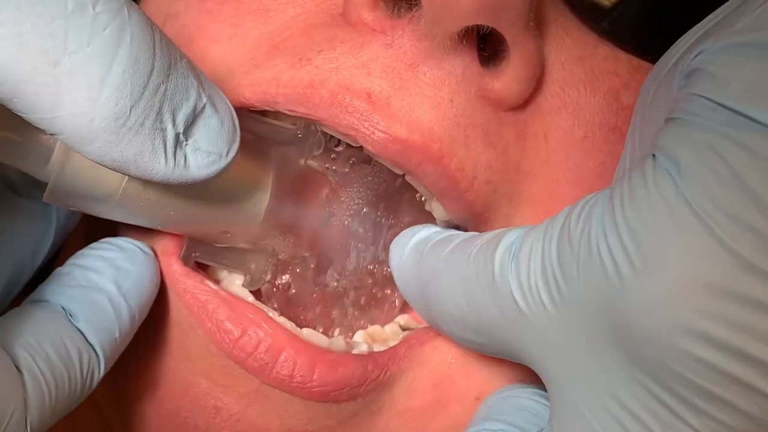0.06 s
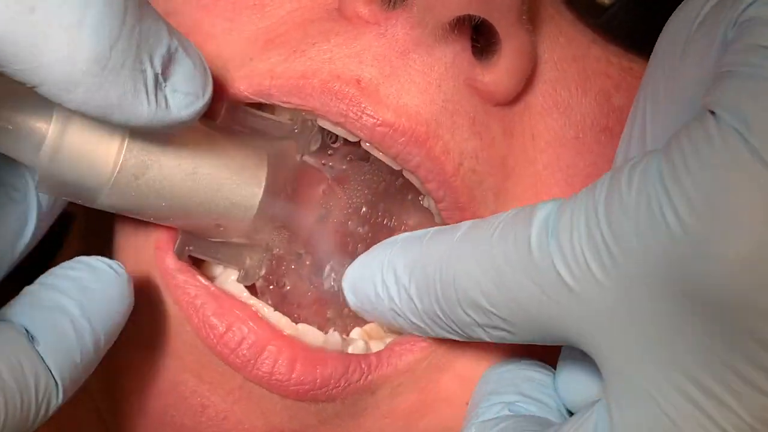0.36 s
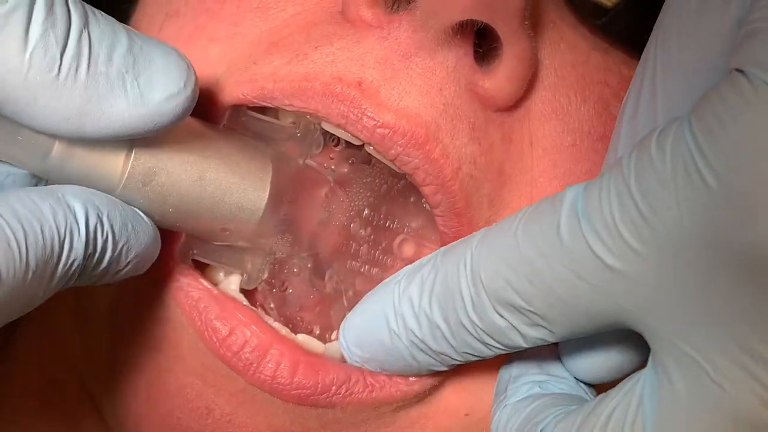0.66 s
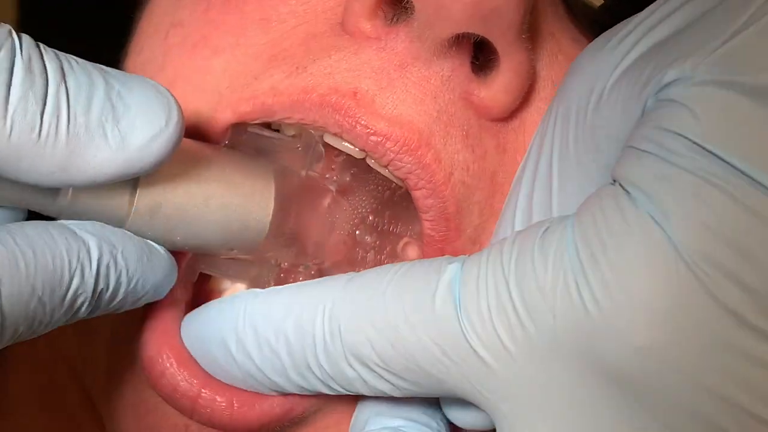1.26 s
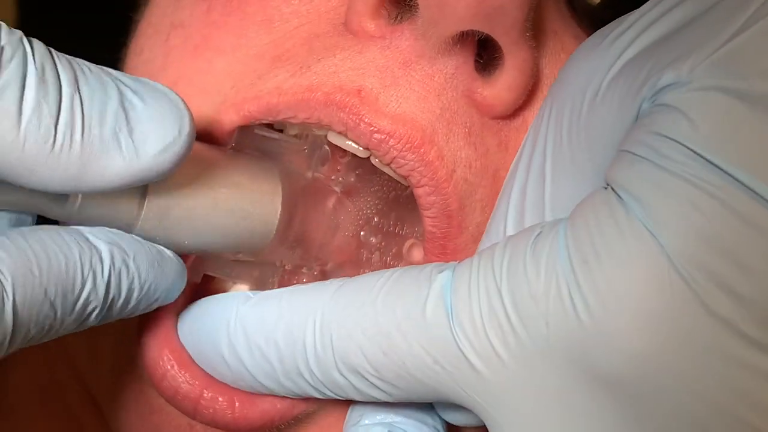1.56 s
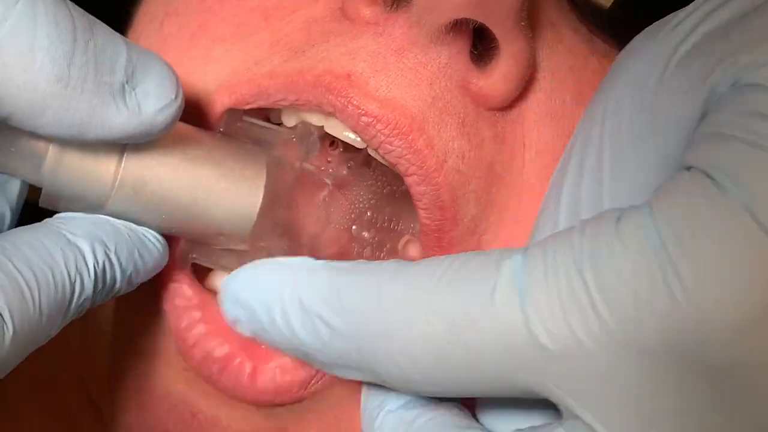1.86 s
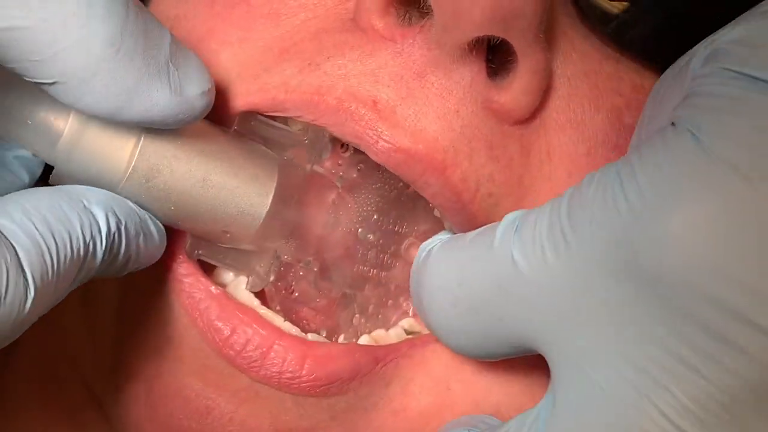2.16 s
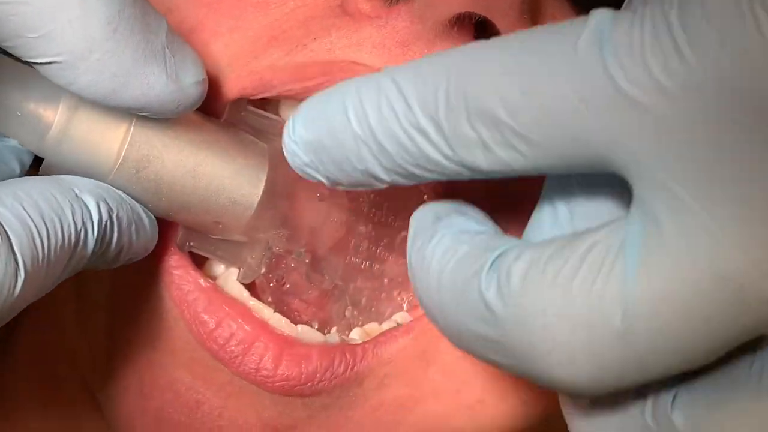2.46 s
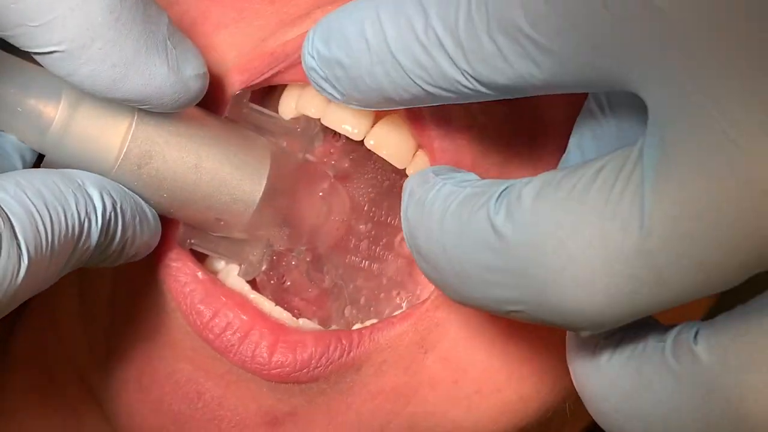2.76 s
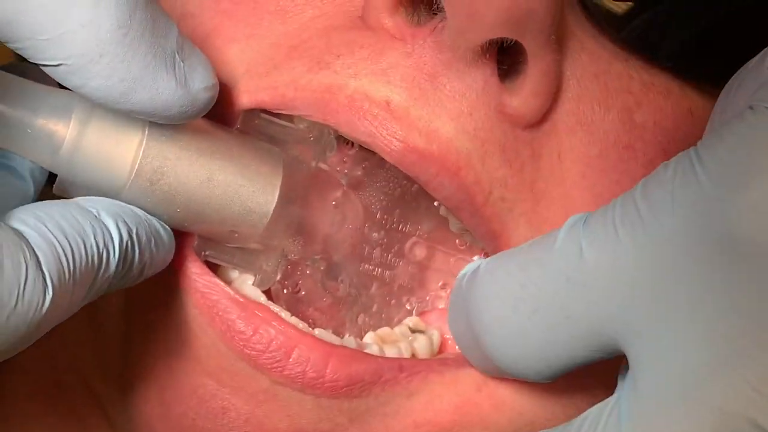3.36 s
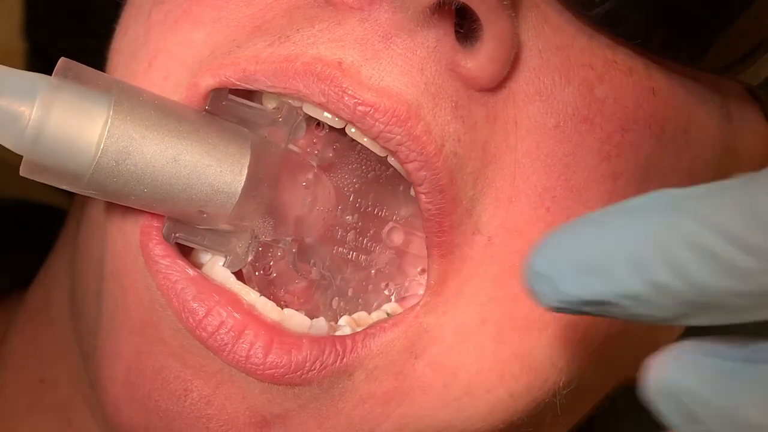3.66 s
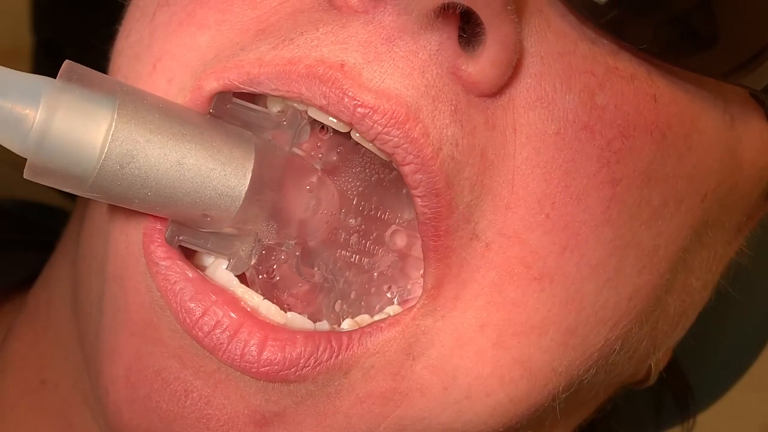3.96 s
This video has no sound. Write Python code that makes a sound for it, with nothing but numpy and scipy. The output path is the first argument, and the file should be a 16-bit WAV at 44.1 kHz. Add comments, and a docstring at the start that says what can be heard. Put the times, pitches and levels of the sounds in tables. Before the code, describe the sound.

Steady, high hiss of air rushing through a dental suction mouthpiece, wavering a little.

```python
"""Dental suction tube

Turbulent air drawn through a plastic mouthpiece hisses in the narrow gaps and excites resonances of
the mouthpiece and the hollow behind it. As gloved fingers shift the lips, the gaps change, so the hiss
swells and changes colour. The tube is heard from close by, and the room hums faintly."""
import sys
import numpy as np
from scipy import signal
from scipy.fft import rfft, irfft, next_fast_len
from scipy.io import wavfile
from scipy.ndimage import map_coordinates

SR = 44100
rng = np.random.default_rng(int(sys.argv[2]) if len(sys.argv) > 2 else 0)


def store_wav(level_fs):
    """Save 16-bit WAV to argv[1]."""
    pcm = np.round(np.clip(np.atleast_2d(level_fs), -1, 1) * 32767)
    wavfile.write(sys.argv[1], SR, pcm.T.astype(np.int16))


N = 176400


def amp(db):
    """Amplitude ratio of a level in decibels."""
    return 10 ** (np.asarray(db) / 20)


def log_curve(rows, hz):
    """Interpolation on a logarithmic frequency axis."""
    knot_hz, values = np.transpose(rows)
    return np.interp(np.log(hz + 1), np.log(knot_hz + 1), values)


def curve(rows, x):
    """Linear interpolation between (x, value) rows."""
    return np.interp(x, *np.transpose(rows))


def smooth_random(*axes):
    """A smooth random field with one knot per unit of each axis."""
    knots = rng.standard_normal((512,) * len(axes))
    return map_coordinates(knots, np.meshgrid(*axes, indexing="ij"), mode="wrap")


def filtered(x, response):
    """Linear filtering: the spectrum is multiplied by a frequency response."""
    size = next_fast_len(N + SR // 2)
    hz = np.fft.rfftfreq(size, 1 / SR)
    return irfft(rfft(x, size) * response(hz), size)[..., :N]


def white_pair():
    """Two uncorrelated white noises at 0 dB per Hz."""
    return rng.standard_normal((2, N)) * np.sqrt(SR / 2)


def resonances(modes, hz, t, level_db, shift_percent=0, flutter_db=1.3, knots_per_s=22):
    """Forced resonance: power (frequency x time) of modes whose joint level flutters with turbulence."""
    stretch = 1 + shift_percent / 100
    power = sum(amp(db) ** 2 / (1 + ((hz[:, None] - pitch_hz * stretch) / half_width_hz) ** 2) ** 2
                for pitch_hz, half_width_hz, db in modes)
    return power * amp(level_db + flutter_db * smooth_random(t * knots_per_s)) ** 2


def gliding_resonance(rows, hz, t, half_width_hz):
    """Variable resonator: power of one mode whose pitch and level move with the lips."""
    time_s, pitch_hz, level_db = np.transpose(rows)
    mode = (np.interp(t, time_s, pitch_hz), half_width_hz, 0)
    return resonances([mode], hz, t, np.interp(t, time_s, level_db))


# Ventilation spectrum: frequency_hz, level_db
RUMBLE_SPECTRUM = [(20, -114), (45, -96.5), (110, -96), (200, -97), (400, -94.5), (1000, -105)]

def ventilation():
    """Broadband noise weighted to low frequencies: the rumble of the room."""
    return filtered(white_pair(), lambda hz: amp(log_curve(RUMBLE_SPECTRUM, hz)))


def mains_hum(pitch_hz=120, rms_db=-77.5):
    """Simple harmonic motion: the mains drives a pure tone in the equipment."""
    return amp(rms_db) * np.sqrt(2) * np.sin(2 * np.pi * pitch_hz * np.arange(N) / SR)


# Spectrum of the flow: frequency_hz, level_db
RUSH_SPECTRUM = [(100, -104), (400, -94), (900, -85.5), (2000, -84), (3800, -81), (4400, -72), (5600, -77),
                 (9000, -72), (12500, -76.5), (16000, -88)]

def rush(hz):
    """Turbulence spreads power over a continuous spectrum beneath the resonances."""
    return amp(log_curve(RUSH_SPECTRUM, hz))[:, None] ** 2


# Modes of the enclosed air: pitch_hz, half_width_hz, level_db
HOLLOW_MODES = [(735, 178, -86), (1278, 105, -73)]
CAVITY_MODES = [(1649, 171, -70.5)]
# Their swells: time_s, gain_db
HOLLOW_SWELL = [(0, -0.5), (.75, 1.5), (1.9, 0), (2.2, -2.5), (2.8, -7.5), (3.5, 0)]
CAVITY_SWELL = [(0, -1.5), (.25, 1), (.5, -5.5), (1.1, -1.5), (1.6, -2), (2.05, -2), (2.75, 2.5),
                (3.1, -0.5), (3.3, 3), (3.7, 1), (4, 2.5)]
# Detuning of the cavity: time_s, shift_percent
CAVITY_DETUNING = [(0, 1), (.2, 6), (.55, 1), (1.1, 2), (1.55, -6), (2.05, -0.5), (2.3, 0), (3.2, -1),
                   (4, 3)]

def hollow(hz, t):
    """Cavity resonance behind the mouthpiece: two low modes hold their pitch while a third wanders."""
    steady = resonances(HOLLOW_MODES, hz, t, curve(HOLLOW_SWELL, t))
    wandering = resonances(CAVITY_MODES, hz, t, curve(CAVITY_SWELL, t), curve(CAVITY_DETUNING, t))
    return steady + wandering


# Midrange modes: pitch_hz, half_width_hz, level_db
WHOOSH_MODES = [(2570, 550, -76), (3160, 365, -71)]
POCKET_MODES = [(2180, 250, -75)]
# Their swells: time_s, gain_db
WHOOSH_SWELL = [(0, -2), (0.22, -6), (0.48, -4.5), (0.8, -2), (1.0, -2), (1.55, -3.5), (2.15, -3.5),
                (2.33, -1.5), (2.52, -5), (3.15, -6), (4, -12)]
POCKET_SWELL = [(0, -4.5), (2.05, -4), (2.7, 3), (3.15, -2), (3.5, 9.5), (3.65, 2.5)]
# Resonance of the mouthpiece: time_s, pitch_hz, level_db
SHELL_GLIDE = [(0, 4770, -70.5), (.4, 4650, -71), (.55, 4430, -78), (.75, 4350, -72), (.97, 4400, -84),
               (1.15, 4640, -74), (1.35, 4950, -68.5), (1.8, 4980, -66), (2.02, 4750, -74),
               (2.2, 5000, -69.5), (2.36, 5000, -77), (2.43, 4760, -65), (2.52, 4900, -73),
               (2.9, 4700, -69), (3.3, 4930, -69), (4, 5100, -69)]

def mouthpiece(hz, t):
    """Flow-excited resonance: the mouthpiece retunes against the lips, above two bands of fixed pitch."""
    whoosh = resonances(WHOOSH_MODES, hz, t, curve(WHOOSH_SWELL, t))
    shell = gliding_resonance(SHELL_GLIDE, hz, t, half_width_hz=400)
    pocket = resonances(POCKET_MODES, hz, t, curve(POCKET_SWELL, t))
    return whoosh + shell + pocket


# Resonances of three gaps around the mouthpiece: time_s, pitch_hz, level_db
LOW_GAP_GLIDE = [(0, 6450, -66), (.04, 6550, -55), (.24, 6400, -70.5), (.35, 6470, -56), (.42, 6430, -70),
                 (.92, 6100, -75), (1.12, 6330, -62.5), (1.45, 6540, -59), (1.8, 6520, -60),
                 (2.02, 6480, -65), (2.18, 6420, -61), (2.6, 6560, -66.5), (2.85, 6680, -63),
                 (3.03, 6400, -67), (3.19, 6430, -63.5), (4, 6140, -68)]
MID_GAP_GLIDE = [(0, 7540, -56), (.35, 7600, -61), (.42, 7600, -79), (.56, 7580, -60.5), (.95, 7560, -62),
                 (1.13, 7650, -71), (1.28, 7500, -60.5), (1.8, 7460, -60.5), (1.92, 7430, -66),
                 (2.3, 7500, -57.5), (2.68, 7640, -67), (3.3, 7570, -60), (3.66, 7400, -61), (4, 7400, -63)]
HIGH_GAP_GLIDE = [(0, 9300, -63), (.3, 9400, -70), (.45, 9800, -63.5), (.8, 9950, -61.5),
                  (1.15, 9340, -59.5), (1.35, 9500, -65), (1.5, 9560, -59), (1.75, 9600, -62),
                  (2.3, 9220, -58.5), (2.9, 9300, -60.5), (3.35, 9350, -58), (3.65, 9330, -58.5),
                  (4, 9400, -62)]

def lip_gaps(hz, t):
    """Aperture resonance: each narrow gap rings at a pitch set by its changing shape."""
    return (gliding_resonance(LOW_GAP_GLIDE, hz, t, half_width_hz=247)
            + gliding_resonance(MID_GAP_GLIDE, hz, t, half_width_hz=340)
            + gliding_resonance(HIGH_GAP_GLIDE, hz, t, half_width_hz=296))


# Treble modes excited by the air: pitch_hz, half_width_hz, level_db
JET_MODES = [(6940, 760, -69.5), (8850, 600, -63.5)]
HISS_MODES = [(10010, 710, -63), (11030, 660, -63.5)]
EDGE_MODES = [(10400, 240, -62.5)]
FIZZ_MODES = [(11880, 480, -68), (13660, 1300, -72.5), (15150, 750, -74)]
# Their swells: time_s, gain_db
JET_SWELL = [(0, 2), (.04, 6.5), (.36, 5), (.4, -1), (.75, 0.5), (1.1, -7), (1.5, -5), (1.95, -11),
             (2.3, 3.5), (2.65, 2), (4, 3)]
HISS_SWELL = [(0, -1), (0.08, 4.5), (0.35, 4.5), (0.41, 0), (0.59, -3), (0.95, -2), (1.15, 0.5), (1.4, -1),
              (1.75, -4), (2.05, 0), (2.2, 1), (2.42, 4), (2.55, 0), (3.05, -1.5), (3.2, -1.5), (3.52, -3),
              (3.66, 3), (4, -0.5)]
EDGE_SWELL = [(0, -2), (.6, -7), (1.2, -1), (1.7, -14), (2.35, 5.5), (2.95, -0.5), (3.2, 4), (3.5, 3.5),
              (3.7, -4)]
FIZZ_SWELL = [(0, -4), (0.13, 3.5), (0.37, 0.8), (0.48, -4), (0.75, 0), (0.92, 0), (1.08, -2.5),
              (1.42, 5.5), (1.85, 3.5), (1.97, 0), (2.13, 0.5), (2.35, -7), (2.43, 3), (2.52, -4.5),
              (3.05, -5), (3.2, -1.5), (3.52, 1), (4, -2.5)]

def air_jet(hz, t):
    """Jet noise: fast air excites four treble bands, each swelling on its own."""
    broad_jet = resonances(JET_MODES, hz, t, curve(JET_SWELL, t))  # drops as the lip closes in at 0.38 s
    main_hiss = resonances(HISS_MODES, hz, t, curve(HISS_SWELL, t))
    thin_whistle = resonances(EDGE_MODES, hz, t, curve(EDGE_SWELL, t))
    top_fizz = resonances(FIZZ_MODES, hz, t, curve(FIZZ_SWELL, t))
    return broad_jet + main_hiss + thin_whistle + top_fizz


def suction(drift_db=1.5, drift_step_hz=130, drift_step_s=0.22, ripple_db=0.85, ripple_step_hz=50):
    """Source and filter: noise is shaped by the summed powers of the flow and its resonances."""
    framing = dict(nperseg=1024, noverlap=768)
    hz, t, noise = signal.stft(white_pair(), SR, **framing)
    power = hollow(hz, t) + mouthpiece(hz, t) + lip_gaps(hz, t) + air_jet(hz, t) + rush(hz)
    short_waves = np.tanh(hz / 1360)[:, None] ** 2  # only these feel the small movements of the hands
    drift = drift_db * short_waves * smooth_random(hz / drift_step_hz, t / drift_step_s)
    ripple = ripple_db * smooth_random(hz / ripple_step_hz)[:, None]  # colour from nearby surfaces
    spectrum = noise * np.sqrt(power) * amp(drift + ripple)
    return signal.istft(spectrum, SR, **framing)[1][:, :N]


# Stereo width: sound that left and right do not share, almost none near 2.9, 8.6 and 13.3 kHz:
# frequency_hz, unshared_to_shared_db
STEREO_DIFFUSENESS = [(40, -10), (600, -15.5), (1300, -8.5), (2200, -12.5), (2550, -51.5), (3250, -52),
                      (3600, 2.5), (4800, -10.5), (5600, -8), (6500, -12.5), (8150, -21), (8450, -54),
                      (8800, -41), (9100, -14.5), (11000, -15.5), (12500, -7), (13300, -28), (14300, -8),
                      (15500, -7)]
# Stereo balance: frequency_hz, left_minus_right_db
STEREO_BALANCE = [(100, 1.5), (350, 0), (700, 6.5), (1300, 5.5), (1950, 4), (2380, 0), (3500, 0),
                  (4800, -6), (6400, -2), (7500, 0)]
# Phase between left and right, opposite in those three narrow bands: frequency_hz, left_lead_rad
STEREO_PHASE = [(100, -0.23), (700, 0.79), (900, 0.23), (1300, 1.27), (1750, 2), (2150, 2.5), (2450, np.pi),
                (3380, np.pi), (3750, 4.5), (4250, 5), (5200, 4), (5700, 6), (6300, 5.5), (7400, 4.5),
                (8150, 4), (8420, np.pi), (8830, np.pi), (9050, 2.5), (10700, 0), (11300, -0.2),
                (12500, -2.1), (13100, -np.pi), (13650, -np.pi), (14100, -4), (15200, -5.5)]

def stereo_image(pair):
    """Partial coherence: two unrelated noises mix into left and right, offset in level and phase."""
    def coherence(hz):
        angle = np.arctan(amp(log_curve(STEREO_DIFFUSENESS, hz)))
        return np.array([np.cos(angle), np.sin(angle)])

    def level_and_phase(hz):
        side = np.array([[0.5], [-0.5]])  # left, right
        return amp(side * log_curve(STEREO_BALANCE, hz)) * np.exp(1j * side * curve(STEREO_PHASE, hz))

    shared, unshared = filtered(pair, coherence)
    return filtered(np.array([shared + unshared, shared - unshared]), level_and_phase)


def scene():
    """Superposition of the suction close by and the room behind it."""
    return stereo_image(suction() + ventilation()) + mains_hum()


def record(dry):
    """Band limiting: an ideal low-pass filter passes nothing above 15.8 kHz."""
    return filtered(dry, lambda hz: hz < 15800)


dry = scene()
out = record(dry)
store_wav(out)
```